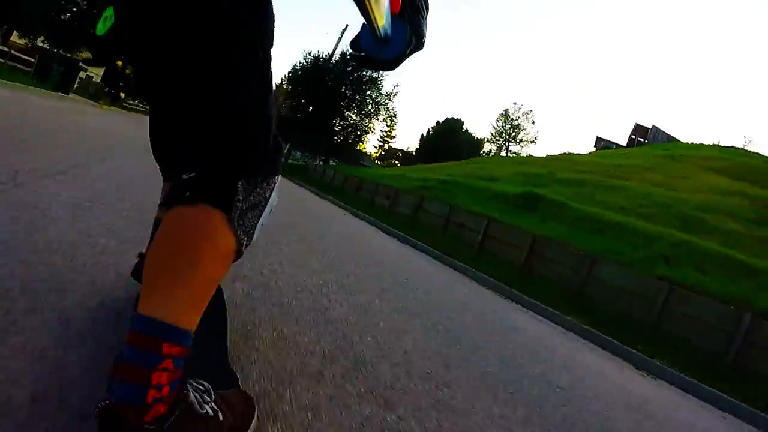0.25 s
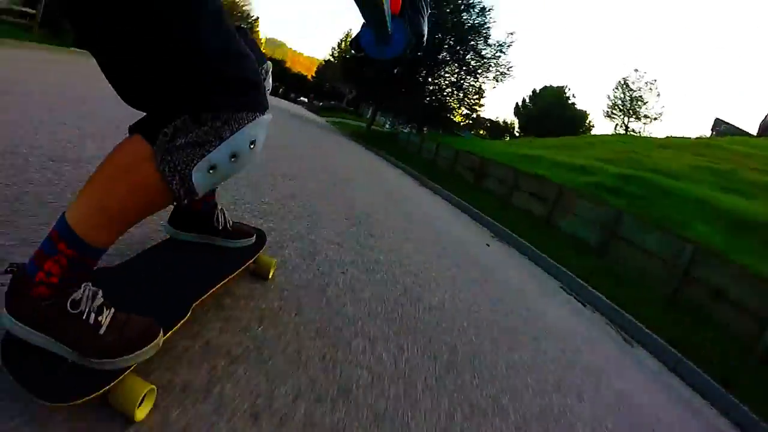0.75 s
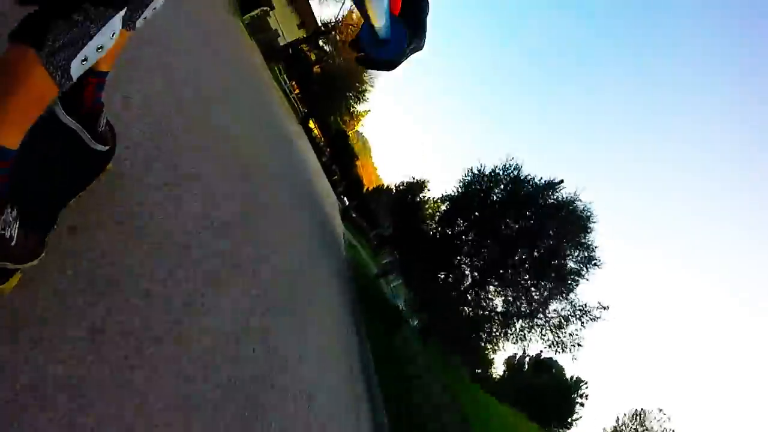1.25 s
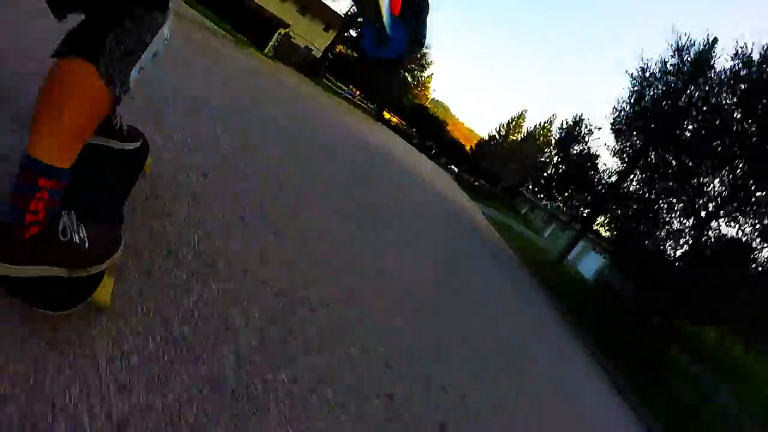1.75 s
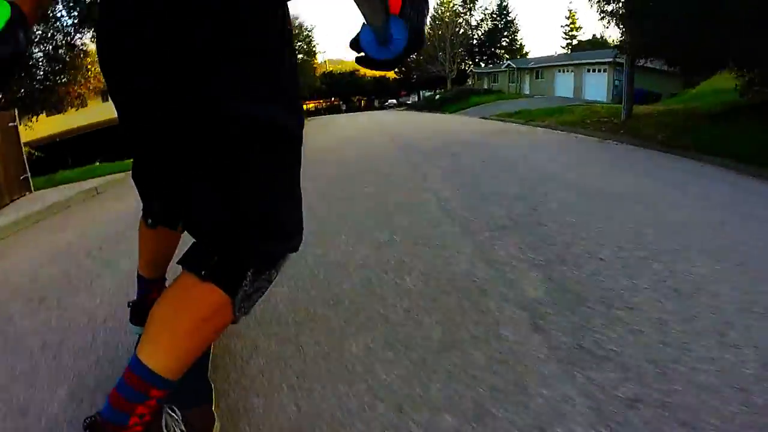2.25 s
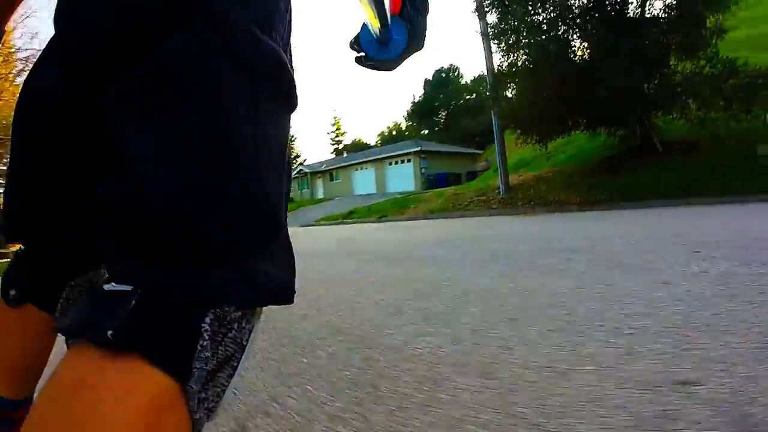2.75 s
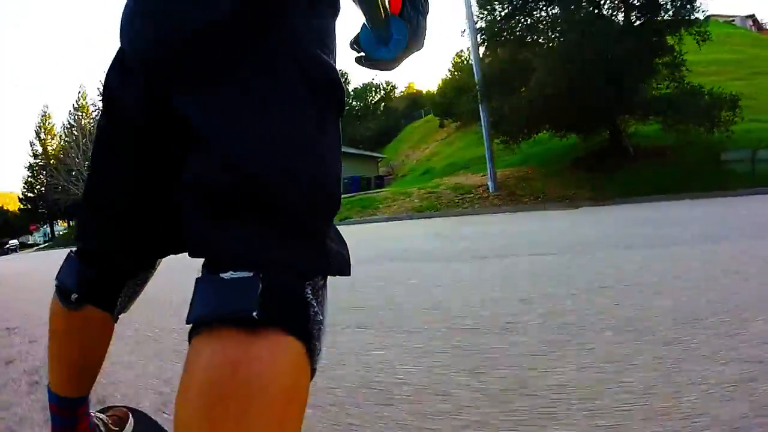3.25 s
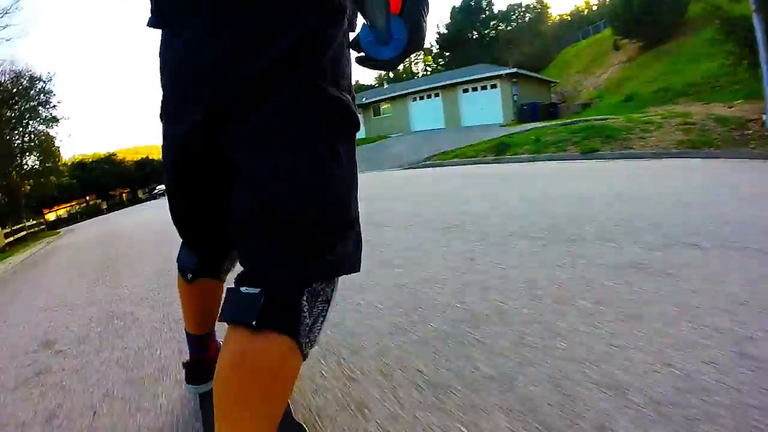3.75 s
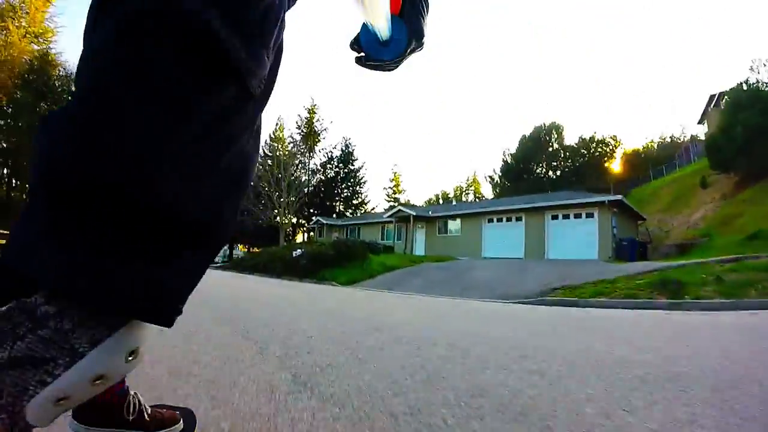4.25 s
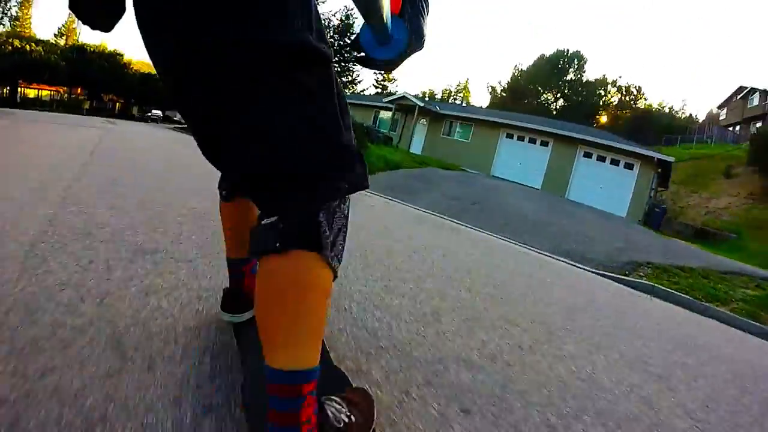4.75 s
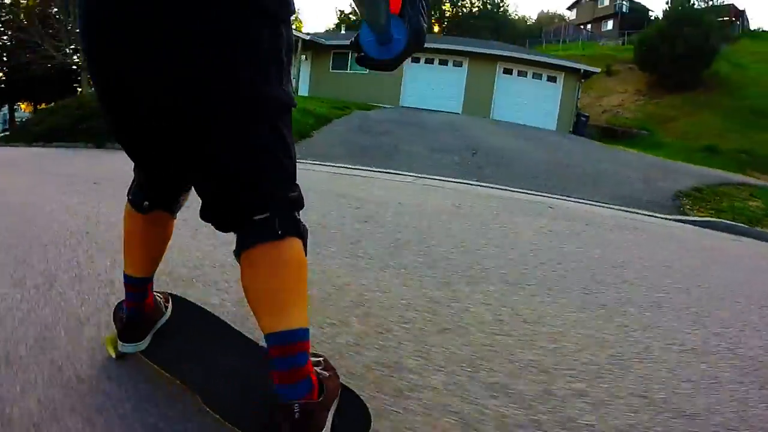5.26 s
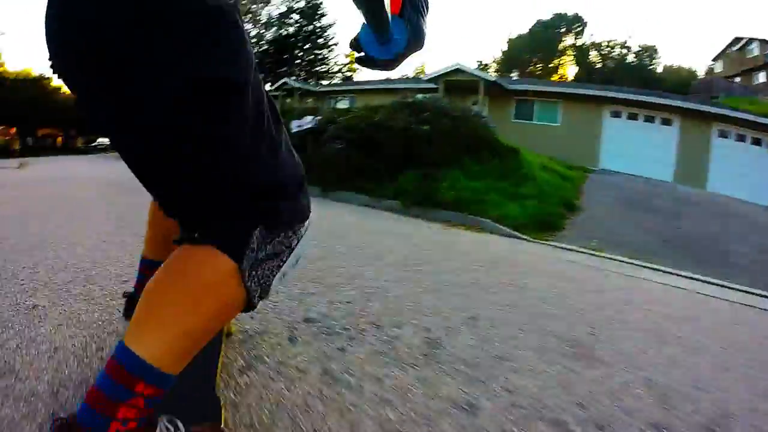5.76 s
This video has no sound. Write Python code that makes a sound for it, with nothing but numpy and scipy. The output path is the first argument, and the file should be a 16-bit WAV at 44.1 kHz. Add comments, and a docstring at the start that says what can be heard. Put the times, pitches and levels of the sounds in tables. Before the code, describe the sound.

Wind thumps and flutters on an enclosed microphone travelling close to a fast skateboard outdoors. The wheels hiss on rough asphalt and the deck booms dully, knocking over bumps. Early on, a sideways slide swells into a rasp and drops away. Rolling continues through heavier gusts around the middle, with a faint brief scrape, and later a scatter of light stone ticks and more knocks.

```python
"""On a coarse asphalt road, longboard wheels roll fast, heard from inside a shut case on a pole.
Road grit shakes the deck, which booms in a few modes and knocks at bumps. The urethane hisses, and
scrubs in a hard turn. Wind buffets the case; loose stones tick. The case dulls wind and deck above
1.6 kHz; wheel hiss, scrape, ticks and faint recorder hiss bypass that filter."""
import sys
import numpy as np
from scipy import signal
from scipy.io import wavfile
from scipy.ndimage import uniform_filter1d

SR = 44100
rng = np.random.default_rng(int(sys.argv[2]) if len(sys.argv) > 2 else 0)


def put_to_file(sound):
    """Save the sound as 16-bit audio at rate SR, in the file named by the first command-line argument."""
    columns = np.atleast_2d(sound).T  # one column per channel
    safe = np.clip(columns, -1, 1)
    whole_steps = np.round(safe * 32767)
    wavfile.write(sys.argv[1], SR, whole_steps.astype(np.int16))


N = 265482

# Spectra of recorder hiss, slow and quick eddies, gripping and sliding wheels, their top octaves,
# and deck rumble. Each row: frequency in Hz, relative density in dB.
RECORDER_HISS_SPECTRUM = [(5000, -30), (7500, 0.5), (10500, -5.5), (13000, -14), (14500, -40)]
BUFFET_SPECTRUM = [(7.1, -31), (12, -6), (28, -1.5), (45, -2.5), (120, -11), (160, -33), (260, -120)]
FLUTTER_SPECTRUM = [(50, -20), (90, -7.5), (150, -2), (230, -5), (330, -7.5), (600, -85.5)]
GRIP_SPECTRUM = [(900, -51.5), (1500, -3.5), (1750, -12.5), (2000, -7), (2380, -15.5), (2950, -11),
                 (3330, -8), (3520, -12), (3850, -21.5), (4100, -21), (4400, -22.5), (4750, -18),
                 (5400, -19.5), (7300, -26), (7900, -43), (12000, -97)]
SCRUB_SPECTRUM = [(900, -44), (1500, -6), (1750, -16.5), (2000, -6.5), (2400, -13.5), (3350, -6.5),
                  (3950, -19), (4300, -19), (4660, -22.5), (5280, -13.5), (5830, -23.5), (6470, -19),
                  (7740, -21.5), (12000, -86)]
GRIP_FIZZ_SPECTRUM = [(6500, -23.5), (8200, -7), (9100, -3.5), (10300, -11), (11500, -13.5), (13000, -18.5),
                      (14000, -36)]
SCRUB_FIZZ_SPECTRUM = [(6500, -23.5), (8200, -3), (9100, -8), (10300, -4.5), (11500, -9), (13000, -13),
                       (14000, -17)]
RUMBLE_SPECTRUM = [(100, -35), (200, -7), (280, -4), (450, -5.5), (640, -6), (900, -5), (1090, -7.5),
                   (1300, -16), (1470, -25.5), (1750, -33), (2400, -56), (5000, -120)]
# Gusts and lulls. Each row: time in seconds, level in dB.
GUSTS = [(0, -19), (.15, -19), (.33, -26.5), (.75, -20.5), (1.1, -18), (1.27, -28), (1.42, -23.5),
         (1.7, -29), (1.93, -31), (2.02, -23), (2.1, -30.5), (2.35, -33.5), (2.45, -22), (2.7, -22),
         (2.88, -25.5), (3.0, -20.5), (3.16, -20.5), (3.24, -20.5), (3.4, -23), (3.55, -32.5), (4.0, -28),
         (4.3, -18.5), (4.52, -21.5), (4.8, -31.5), (4.92, -24), (5.1, -30), (5.28, -18), (5.42, -18.5),
         (5.5, -33.5), (5.66, -22), (5.82, -37), (5.99, -16)]
# Single strong eddies. Each row: centre in seconds, peak in dB, swing rate in Hz.
STRONG_EDDIES = [(0.156, -8.5, 45), (0.55, -6.5, 36.5), (0.665, -12, 44.7), (0.745, -14, 50.6),
                 (0.873, -11.5, 39), (1.114, -13, 45), (2.015, -21, 44.3), (2.454, 1, 44), (2.59, -5, 35.7),
                 (2.621, -11, 60), (2.778, -14, 35), (2.833, -6, 42.4), (2.941, -12, 45), (3.029, -8, 62.4),
                 (3.082, -9.5, 45), (3.12, -14, 55), (3.153, -8.5, 52), (3.301, -16, 42),
                 (3.374, -10, 41.7), (4.315, -9.5, 40), (4.391, -13, 45), (4.507, -8.5, 45.3),
                 (5.158, -13.5, 40), (5.275, -8.5, 52), (5.343, -11, 40), (5.388, -7, 49), (5.656, -11, 52),
                 (5.982, -9, 40.2)]
# Stones hitting the deck. Each row: start in seconds, drive of the low, middle and top case mode in dB,
# rise time in seconds.
STONES = [(0.149, -33, -31, -51, 0.0023), (0.5806, -30, -36, -60, 0.0017), (1.59, -28, -24, -58, 0.0022),
          (1.887, -44, -46, -56, 0.0008), (2.055, -40, -38, -56, 0.0018),
          (2.061, -22.5, -28.5, -48, 0.0018), (3.222, -38, -40, -47, 0.00055),
          (3.585, -38, -41, -50, 0.0017), (3.867, -45, -55, -61, 0.0015), (3.986, -42, -47, -54, 0.0014),
          (4.428, -32, -36, -60, 0.0012), (4.489, -26, -30, -46, 0.00084), (4.504, -27, -35, -62, 0.001),
          (4.578, -29, -26, -46, 0.0011), (4.672, -30, -29.5, -66, 0.0018), (4.6947, -31, -32, -62, 0.0015),
          (4.724, -23, -43, -64, 0.0014), (4.75, -35, -36, -56, 0.0012), (4.763, -20, -33, -55, 0.0018),
          (4.782, -25, -30, -59, 0.0014), (4.809, -32, -39, -57, 0.001), (4.823, -34, -41, -48, 0.0016),
          (5.117, -48, -48, -46, 0.0015), (5.257, -24, -38, -58, 0.0021), (5.3544, -44, -51, -58, 0.0015),
          (5.8, -25, -38, -62, 0.0018)]
# Case modes: low, middle, top, one under, one over. Each row: frequency in Hz, width in Hz.
CASE_MODES = [(3390, 770), (5260, 1800), (9600, 3200), (2050, 500), (13200, 2500)]
# Wheel edge dragging mid-carve. Each row: time in seconds, level in dB, pitch in Hz.
EDGE_DRAG = [(2.7, -67, 4660), (2.78, -55, 4700), (2.87, -55, 4560), (3.02, -66, 4750)]
# Wheel hiss. Each row: time in seconds, overall gain in dB, sheen (above 6 kHz) and scuff (near 5 kHz)
# as relative gains in dB.
HISS_GAINS = [(0, -45, -16, -9), (.2, -44.5, -9.5, -9), (.43, -48, -14, -8), (.6, -45.5, -11, -4),
              (.76, -45.5, -15.5, -12.5), (1.06, -43.5, -8, -10.5), (1.35, -43, -7.5, -4),
              (1.745, -45.5, -8, -3), (1.775, -57, -11, -4), (1.8, -56, -10, -6), (1.83, -60, -13, -9),
              (1.95, -52, -16, -13), (2.1, -49.5, -12.5, -9), (2.26, -46, -13, -9), (2.41, -44.5, -8.5, -4),
              (2.65, -52.5, -12, -7.5), (2.85, -49, -8.5, -14), (3.0, -49, -10.5, -8),
              (3.14, -52.5, -12, -8), (3.35, -48, -11, -8), (3.75, -51.5, -10.5, -8.5), (4.0, -47, -12, -7),
              (4.27, -42, -11.5, -8), (4.63, -44, -13.5, -10.5), (4.76, -44, -12, -4),
              (4.95, -44.5, -7, -10), (5.25, -44.5, -11, -15), (5.4, -47, -14.5, -12.5),
              (5.66, -46, -13, -7.5), (5.96, -47.5, -10, -8)]
# Notch in the hiss, shifting as the pole swings. Each row: time in seconds, centre in Hz, depth in dB.
HISS_HOLLOW = [(0, 4380, 10), (.7, 4440, 4.5), (1.0, 4500, -1), (1.6, 4600, 3), (1.95, 4340, 2),
               (2.3, 4400, 9), (2.55, 4420, 5), (2.8, 4400, -10), (3.1, 4350, -8), (3.6, 4500, 1),
               (4.1, 4400, 10), (4.3, 4500, -4), (4.7, 4520, 6), (5.3, 4600, 5), (6, 4480, 4)]
# Wandering band of hiss. Each row: time in seconds, centre in Hz, lift in dB.
HISS_BAND = [(0, 5300, -2), (.14, 5650, 6), (.24, 6200, 8), (.36, 6200, -3), (.8, 5900, 8), (1.05, 5730, 9),
             (1.2, 6000, 0), (1.35, 6500, 4), (1.55, 6300, 2), (1.72, 5860, 6), (2.5, 6250, 4),
             (2.9, 6500, 4), (3.1, 6400, 4.5), (4.75, 6100, 1.5), (4.95, 6300, 6), (5.3, 6100, 2.5),
             (6, 5900, 4)]
# Road bumps. Each row: start in seconds, gain in dB, pitch in Hz, T60 in seconds, second mode in
# relative dB.
BUMPS = [(0.026, -6.5, 351, 0.12, -14), (0.214, 6, 366, 0.055, -25), (0.792, 6.5, 405, 0.022, 2.5),
         (0.884, 4, 346, 0.039, -3), (1.05, -2, 401, 0.082, 0), (1.085, -6, 392, 0.096, 0),
         (1.149, -4, 383, 0.1, -13), (1.175, -4.5, 373, 0.14, -23), (1.437, -3, 320, 0.1, -7),
         (1.598, 4.5, 380, 0.035, -25), (2.949, 2, 359, .055, -12), (3.02, -2, 368, 0.075, -14),
         (3.237, -6.5, 365, 0.088, -16), (3.271, -3, 374, 0.051, 0.5), (3.315, -4.5, 368.4, 0.19, -6.5),
         (3.594, -9, 345, 0.15, -4), (3.778, 1.5, 376, 0.046, -4), (4.604, -6, 320, 0.11, 3),
         (4.677, -5.5, 348, 0.093, 1.5), (4.732, 1.5, 308, 0.058, -14), (4.811, -8, 378, 0.059, -9.5),
         (4.845, -5, 355, 0.11, -23), (4.885, -3, 372, 0.12, -14), (4.965, -1, 352, 0.11, -11),
         (5.084, -6, 372, 0.086, -17), (5.11, -4, 331, 0.1, -20), (5.17, -6, 370, 0.12, -13),
         (5.476, -4, 353, 0.064, -3), (5.895, -1, 319, 0.069, -19), (5.989, -11, 325, 0.045, -9)]
# Rolling. Each row: time in seconds, deck gain in dB, relative gain of the lowest mode in dB,
# gain of the rasp near 1.7 kHz in dB.
ROLL_GAINS = [(0, -24.5, 7.5, -48), (.15, -21.5, -0.5, -41), (.32, -24.5, -10, -42.5),
              (.5, -22.5, -8.5, -46), (.77, -27, 2, -43), (.88, -22, 1, -36.5), (1.0, -18, -4, -38),
              (1.17, -19.5, -2.5, -36.5), (1.5, -20.5, -3, -36), (1.74, -24.5, -11, -39),
              (1.8, -30.5, 2, -53.5), (1.97, -27, -4, -49.5), (2.1, -25.5, -4, -46.5),
              (2.45, -21.5, -4, -44.5), (2.62, -26.5, 1.5, -52), (2.87, -21.5, -2, -48),
              (3.05, -24, 2.5, -49.5), (3.3, -26.5, 6, -51.5), (3.55, -25.5, -2, -49),
              (3.7, -27.5, 10, -55), (3.76, -25.5, -10, -46), (3.82, -25.5, 0, -48.5), (4.0, -23, -9, -50),
              (4.35, -24, 4, -46.5), (4.65, -22, 7.5, -46.5), (4.78, -20, -1, -41.5),
              (4.95, -22.5, 3.5, -41), (5.04, -26, 0, -42.5), (5.12, -23, 0, -41.5), (5.4, -26.5, 9, -45),
              (5.6, -22, 1.5, -47), (5.8, -23.5, 4, -51), (5.97, -21, 6, -42.5)]
# Lowest deck mode, drifting as the rider's weight shifts. Each row: time in seconds, pitch in Hz.
BOOM_PITCH = [(0, 386), (.6, 353), (1.1, 415), (1.5, 383), (2.1, 335), (3.0, 379), (4.2, 318), (4.7, 374),
              (5.3, 370), (6, 336)]
# Upper deck modes. Each row: frequency in Hz, width in Hz, level in dB relative to the rumble.
UPPER_MODES = [(700, 137, -14.5), (883, 280, -17)]

SECOND_MODE_HZ = 555
SLIDE_START_S, SLIDE_FULL_S, SLIDE_END_S, CATCH_S = 0.72, 1.17, 1.75, 0.07
BITE_S, BITE_WIDTH_S, BITE_DB = 1.037, 0.055, 6
TIME_S = np.arange(N) / SR


def gain_of(db):
    """Decibels to amplitude."""
    return 10 ** (np.asarray(db) / 20)


def unit_rms(x):
    """Scales to rms 1."""
    return x / np.sqrt(np.mean(x ** 2) + 1e-20)


def bell(x, centre, width, power=2):
    """Peak of height 1; a higher power flattens the top."""
    return np.exp(-((x - centre) / width) ** power)


def spectrum_db(spectrum, hz):
    """Interpolates a spectrum on a log-frequency axis."""
    points_hz, db = np.transpose(spectrum)
    return np.interp(np.log(hz + 1), np.log(points_hz + 1), db)


def curves(rows, t):
    """Interpolates each column at the times t."""
    times_s, *columns = np.transpose(rows)
    return [np.interp(t, times_s, column) for column in columns]


def add(mix, start_s, sound):
    """Mixes a sound in at start_s."""
    part = mix[round(start_s * SR):][:len(sound)]
    part += sound[:len(part)]


def resonate(x, hz, *widths_hz):
    """Unity-gain resonances in series, one per width: shift hz to zero, smooth, shift back."""
    carrier = np.exp(2j * np.pi * np.cumsum(hz * np.ones(len(x))) / SR)
    for width_hz in widths_hz:
        pole = np.exp(-np.pi * width_hz / SR)
        x = 2 * (carrier * signal.lfilter([1 - pole], [1, -pole], x / carrier + 1e-18)).real
    return x


def drift(top_hz):
    """Slow random motion of rms 1."""
    rates_hz = np.geomspace(top_hz / 8, top_hz, num=12)
    return unit_rms(sum(np.sin(2 * np.pi * (hz * TIME_S + rng.random())) for hz in rates_hz))


def grit(per_s, spread_db, share):
    """Smooth noise plus sparse, uneven impacts that carry a share of the power."""
    sizes = gain_of(spread_db * np.minimum(rng.exponential(size=N), 5)) * rng.choice([-1, 1], N)
    impacts = unit_rms(sizes * (rng.random(N) < per_s / SR))
    return np.sqrt(share) * impacts + np.sqrt(1 - share) * rng.standard_normal(N)


def shaped(x, db_of, patchy_db, frame):
    """Colours x by db_of(Hz, s), with random louder and softer patches."""
    framing = dict(nperseg=frame, noverlap=frame - frame // 4)
    hz, t, bins = signal.stft(x, SR, **framing)
    patches = uniform_filter1d(rng.standard_normal(bins.T.shape).T, size=6, axis=0)
    patches = unit_rms(uniform_filter1d(patches, size=12, axis=1))
    bins = bins * gain_of(db_of(hz[:, None], t) + patchy_db * patches)
    return signal.istft(bins, SR, **framing)[1][:N]


def coloured(x, spectrum, patchy_db, frame):
    """Shapes x to a steady spectrum, at rms 1."""
    return unit_rms(shaped(x, lambda hz, t: spectrum_db(spectrum, hz), patchy_db, frame))


def case_muffle(x, cutoff_hz=1600):
    """The shut case holds back the treble of what shakes it."""
    return signal.sosfilt(signal.butter(6, cutoff_hz, fs=SR, output="sos"), x)


def recorder_hiss(level_db=-77.5):
    """Faint steady treble hiss of the recorder."""
    noise = rng.standard_normal(N)
    return gain_of(level_db) * coloured(noise, RECORDER_HISS_SPECTRUM, patchy_db=1.5, frame=512)


def wind(swell_db=1.9, flutter_follow=0.91):
    """Eddies strike the case: slow buffeting, and quick flutter that partly follows the gusts."""
    level_db, = curves(GUSTS, TIME_S)
    eddies = grit(per_s=90, spread_db=3, share=0.29)
    buffet = coloured(eddies, BUFFET_SPECTRUM, patchy_db=0.63, frame=4096)
    flutter = coloured(eddies, FLUTTER_SPECTRUM, patchy_db=1, frame=4096)
    flutter_db = -27.5 + flutter_follow * (level_db - level_db.mean())
    return gain_of(level_db + swell_db * drift(10)) * buffet + gain_of(flutter_db) * flutter


def wind_thumps(half_width_cycles=0.47):
    """Each strong eddy is a brief suction between two pushes."""
    out, t = np.zeros(N), np.arange(-2000, 2000) / SR
    for centre_s, db, hz in STRONG_EDDIES:
        swing = -np.cos(2 * np.pi * hz * t) * bell(t * hz, 0, half_width_cycles)
        add(out, centre_s + t[0], gain_of(db) * swing)
    return out


def stone_ticks(under_db=-6.5, over_db=-13):
    """Each stone is a few milliseconds of scratch that rings the case."""
    drives, t = np.zeros((N, len(CASE_MODES))), np.arange(900) / SR
    for start_s, low_db, middle_db, top_db, rise_s in STONES:
        age = t / rise_s
        scratch = np.sign(rng.standard_normal(len(t))) * age * np.exp(1 - age)
        gains = gain_of([low_db, middle_db, top_db, low_db + under_db, top_db + over_db])
        add(drives, start_s, np.outer(scratch, gains))
    return sum(resonate(drive, hz, width_hz, width_hz, 2 * width_hz)
               for drive, (hz, width_hz) in zip(drives.T, CASE_MODES))


def edge_scrape():
    """One wheel edge drags briefly: grit through a narrow resonance."""
    level_db, hz = curves(EDGE_DRAG, TIME_S)
    dragging = (TIME_S > EDGE_DRAG[0][0]) & (TIME_S < EDGE_DRAG[-1][0])
    road = grit(per_s=1500, spread_db=2.8, share=0.3)
    return dragging * gain_of(level_db) * unit_rms(resonate(road, hz, 550, 700))


def hiss_colour_db(hz, t):
    """Wheel spectrum over time: grip turns to sideways scrub, then the wheels catch."""
    level_db, sheen_db, scuff_db = curves(HISS_GAINS, t)
    _, _, rasp_db = curves(ROLL_GAINS, t)
    hollow_hz, hollow_db = curves(HISS_HOLLOW, t)
    band_hz, band_db = curves(HISS_BAND, t)
    slide = np.interp(t, [SLIDE_START_S, SLIDE_FULL_S, SLIDE_END_S, SLIDE_END_S + CATCH_S], [0, 1, 1, 0])
    body_db = (1 - slide) * spectrum_db(GRIP_SPECTRUM, hz) + slide * spectrum_db(SCRUB_SPECTRUM, hz)
    body_db += (scuff_db + 7) * bell(hz, 4950, 650, power=4)
    body_db += (sheen_db + 9) * bell(hz, 6600, 1000, power=4)
    body_db += (rasp_db - level_db - 3) * bell(hz, 1700, 800, power=4)
    body_db -= hollow_db * bell(hz, hollow_hz, 190)
    body_db += band_db * bell(hz, band_hz, 350)
    fizz_db = sheen_db - 19 + (1 - slide) * spectrum_db(GRIP_FIZZ_SPECTRUM, hz)
    fizz_db += slide * (spectrum_db(SCRUB_FIZZ_SPECTRUM, hz) + 3.5)
    return level_db + 10 * np.log10(gain_of(2 * body_db) + gain_of(2 * fizz_db))  # power sum


def wheel_hiss():
    """Urethane rubs on grit."""
    road = grit(per_s=1800, spread_db=2.1, share=0.59)
    return gain_of(23) * shaped(road, hiss_colour_db, patchy_db=1.2, frame=512)


def deck_knocks(rise_s=0.0076):
    """Each bump briefly rings the two low deck modes."""
    out, t = np.zeros(N), np.arange(8000) / SR
    for start_s, db, hz, t60_s, second_db in BUMPS:
        envelope = (1 - np.exp(-t / rise_s)) * gain_of(-60 * t / t60_s)
        lowest = np.sin(2 * np.pi * (hz * t + rng.random()))
        second = gain_of(second_db) * np.sin(2 * np.pi * (SECOND_MODE_HZ * t + rng.random()))
        add(out, start_s, gain_of(db) * envelope * (lowest + second))
    return out


def deck_rumble(wander_hz=23.8, swell_db=0.9, second_follow=0.38):
    """Asphalt grain drives the deck: broad rumble, two strong low modes, weaker upper ones."""
    level_db, boom_db, _ = curves(ROLL_GAINS, TIME_S)
    boom_hz = curves(BOOM_PITCH, TIME_S)[0] + wander_hz * drift(14)
    road = grit(per_s=900, spread_db=0.96, share=0.26)
    rumble = coloured(road, RUMBLE_SPECTRUM, patchy_db=0.79, frame=1024)
    boom = unit_rms(resonate(road, boom_hz, 130, 260))
    boom *= gain_of(boom_db - 7 + swell_db * drift(5.6))
    second = unit_rms(resonate(road, SECOND_MODE_HZ, 140, 260))
    second *= gain_of(second_follow * boom_db - 9 + swell_db * drift(13))
    upper = sum(gain_of(db) * unit_rms(resonate(road, hz, width_hz, 2 * width_hz))
                for hz, width_hz, db in UPPER_MODES)
    upper *= gain_of(BITE_DB * bell(TIME_S, BITE_S, BITE_WIDTH_S))  # roar as the slide bites
    return gain_of(level_db + 4) * (rumble + boom + second + upper)


def scene():
    """All sources at one microphone."""
    muffled = case_muffle(wind() + wind_thumps() + deck_rumble() + deck_knocks())
    return (muffled + wheel_hiss() + edge_scrape() + stone_ticks() + recorder_hiss())[None]


def record(dry):
    """Soft limit on the loudest buffets, then a 14 kHz low-pass."""
    limited = dry / (1 + abs(dry / 0.95) ** 4) ** 0.25
    lowpass = signal.firwin(255, 14000, window=("kaiser", 9), fs=SR)
    return signal.oaconvolve(limited, lowpass[None], "same")


dry = scene()
out = record(dry)
put_to_file(out)
```